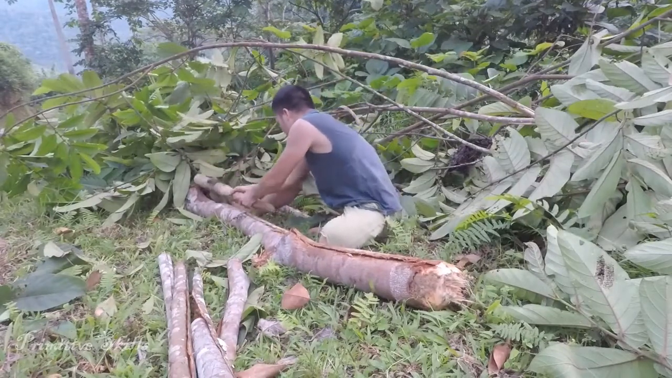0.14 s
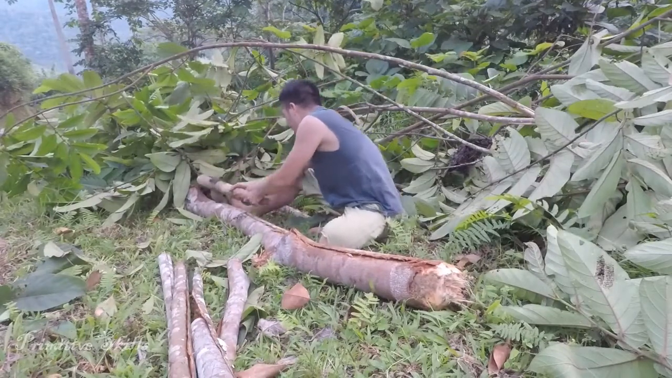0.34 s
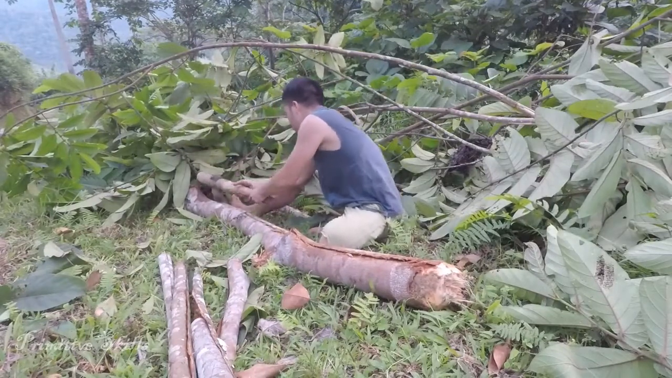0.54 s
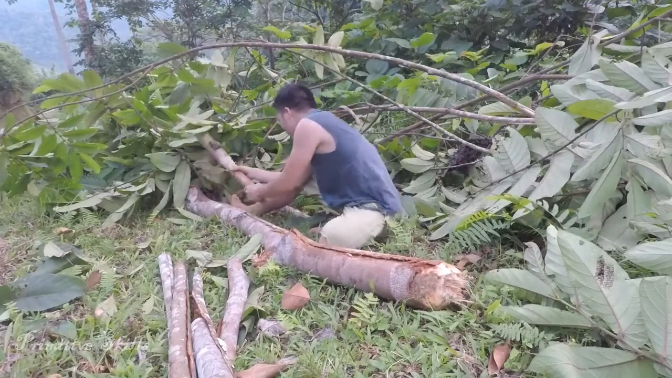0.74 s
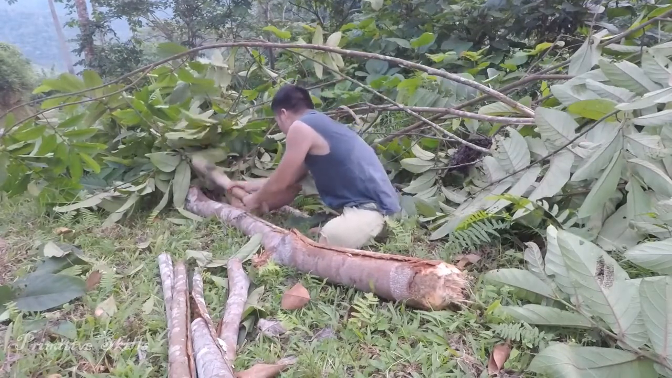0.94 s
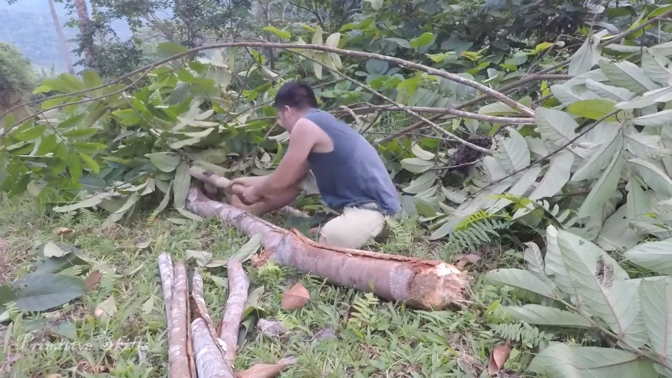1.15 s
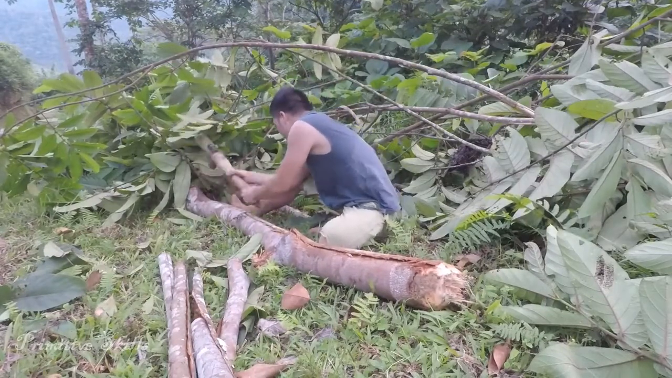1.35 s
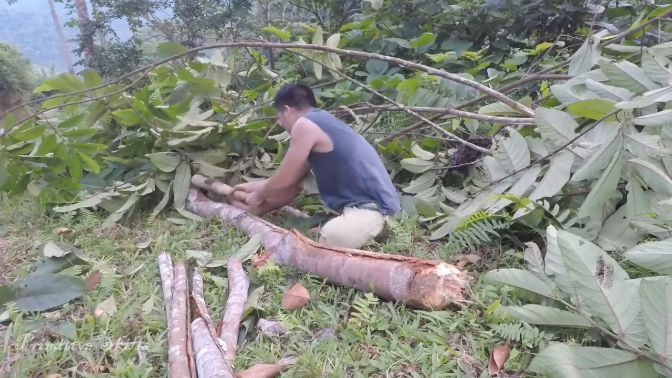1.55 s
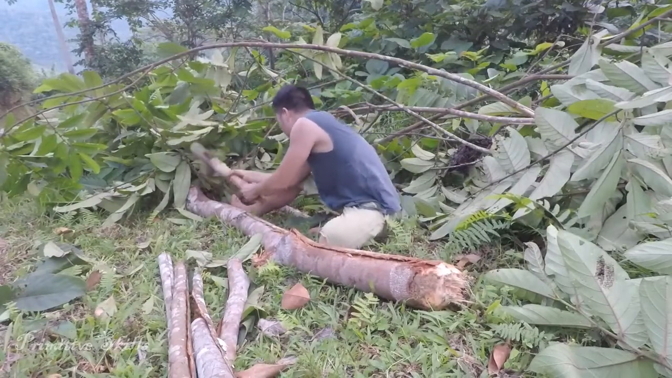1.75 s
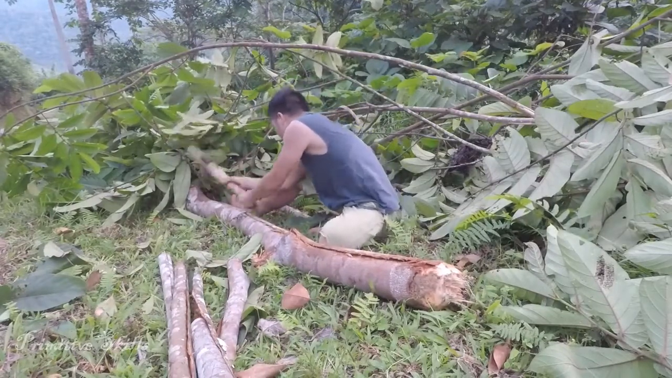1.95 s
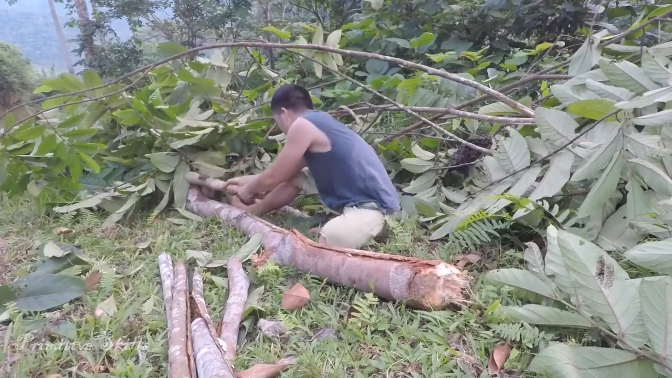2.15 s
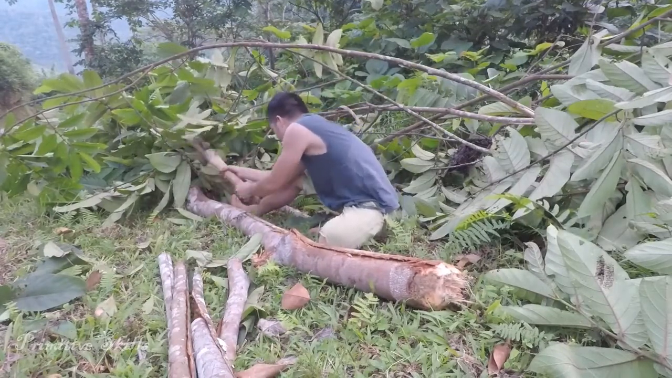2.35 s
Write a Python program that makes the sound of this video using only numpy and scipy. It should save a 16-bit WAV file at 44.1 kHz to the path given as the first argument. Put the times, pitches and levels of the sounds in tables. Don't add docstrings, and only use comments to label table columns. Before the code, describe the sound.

A wooden club strikes a felled log four times, knocking and thudding, while forest insects trill

```python
import sys
import numpy as np
from scipy import signal
from scipy.fft import rfft, irfft
from scipy.io import wavfile

SR = 44100
rng = np.random.default_rng(int(sys.argv[2]) if len(sys.argv) > 2 else 0)


def master_out(mix):
    frames = np.transpose(np.atleast_2d(mix))
    ceiling = np.clip(frames, -1, 1)
    pcm = np.round(ceiling * 32767).astype(np.int16)
    wavfile.write(sys.argv[1], SR, pcm)


def ratio_of_db(decibels):
    return 10 ** (np.asarray(decibels, float) / 20)


N = 105840

# t/s, log ring level/dB, brightness/dB per octave, partner modes level/dB, thud level/dB
BLOWS = [
    (0.2193, -12, 3, 0, -8.5),
    (1.079, -16, 3.5, 0, -2),
    (1.579, -15, 2.5, 1.5, -9),
    (2.1003, -17.5, 3.5, 2, -1.5),
]
# knock f/Hz, knock level/dB, snap f/Hz, snap level/dB, bark crush level/dB
CONTACTS = [(1466, -9, 2570, -17, -62), (1754, -14, 5340, -20.5, -23), (1636, -13.5, 4000, -11.5, -34),
            (1828, -13, 3960, -18.5, -23.5)]


def rms_one(x):
    return x / np.sqrt(np.mean(x ** 2) + 1e-20)


def drift(rate):
    step = 40
    r = np.exp(-2 * step * np.pi * rate / SR)
    noise = rng.standard_normal(N // step + 2002)
    slow = signal.lfilter([1], [1, -2 * r, r * r], noise)[2000:]
    return np.interp(np.arange(N) / step, np.arange(len(slow)), rms_one(slow))


def ring(x, hz, t60):
    r, w = ratio_of_db(-60 / (t60 * SR)), 2 * np.pi * hz / SR
    return signal.lfilter([0, np.sin(w)], [1, -2 * r * np.cos(w), r * r], x + 1e-18)


def resonate(x, hz, width_hz):
    r = np.exp(-np.pi * width_hz / SR)
    poles = [1, -2 * r * np.cos(2 * np.pi * hz / SR), r * r]
    return signal.lfilter([(1 - r * r) / 2, 0, (r * r - 1) / 2], poles, x)


def cut(x, hz, kind, order=2):
    return signal.sosfilt(signal.butter(order, hz, kind, fs=SR, output="sos"), x)


def colour(x, spectrum):
    hz, db = np.transpose(spectrum)
    f = np.arange(N // 2 + 1) * SR / N + 1
    return rms_one(irfft(rfft(x) * ratio_of_db(np.interp(np.log(f), np.log(hz), db)), N))


def clicks(s, gains):
    out = np.zeros(N)
    np.add.at(out, np.clip(np.asarray(s) * SR, 0, N - 1).astype(int), gains)
    return out


def grains(per_s, spread_db):
    sizes = ratio_of_db(spread_db * np.minimum(rng.exponential(1, (2, N)), 5))
    sizes = sizes * rng.choice([-1, 1], (2, N))
    return sizes * (rng.random((2, N)) < per_s / SR)


def later(x, s):
    return np.interp(np.arange(N) - s * SR, np.arange(N), x)


def pan(x, db):
    return x * ratio_of_db(np.array([[db / 2], [-db / 2]]))


def spread(pair, alike):
    alike = np.clip(alike, 0, 1)
    mid = np.sqrt(1 + alike) * pair[0]
    side = np.sqrt(1 - alike) * pair[1] * np.array([[1], [-1]])
    return (mid + side) / np.sqrt(2)


def air():
    # f/Hz, level/dB per Hz
    air_spectrum = [(60, -28), (150, 3.5), (400, -6.5), (1200, -16), (3000, -10), (8200, -17.5),
                    (8800, -28.5)]
    low = colour(spread(rng.standard_normal((2, N)), 0.067), air_spectrum)
    hiss = rms_one(cut(rng.standard_normal((2, N)), [10500, 14000], "band"))
    return low * ratio_of_db(-48 + 1.0 * drift(1.33)) + hiss * ratio_of_db(-74 + 0.8 * drift(3.9))


def through_shell(x):
    return cut(x, 8340, "low", order=10)


def cicada_chorus():
    # f/Hz, width/Hz, level/dB
    shells = [(4762, 428, -0.5), (5057, 190, -0.5), (5420, 355, 0), (5740, 2050, -13.5), (7646, 684, -5.5)]
    swarm = spread(grains(5400, 1.52), 0.69)
    chorus = 0
    for k, (hz, width_hz, db) in enumerate(shells):
        voice = resonate(resonate(swarm, hz, 2 * width_hz), hz, width_hz)
        chorus = chorus + ratio_of_db(db + 1.17 * drift(10.3)) * (-1) ** k * voice
    return through_shell(pan(ratio_of_db(-40) * rms_one(chorus), 1))


def near_buzz():
    # f/Hz, width/Hz, level/dB
    buzz_shell = [(7330, 600, 12), (7130, 130, -0.5)]
    start_s, period_s, pulse_s = 0.0165, 0.01998, 0.00267
    s = (start_s + period_s * np.arange(121)[:, None] + pulse_s * np.arange(5)).ravel()
    gains = ratio_of_db(rng.normal(0, 3.2, len(s))) * (s < N / SR)
    pulses = clicks(s + rng.normal(0, 0.00015, len(s)), gains)
    buzz = 0
    for hz, width_hz, db in buzz_shell:
        buzz = buzz + ratio_of_db(db) * resonate(resonate(pulses, hz, 2 * width_hz), hz, width_hz)
    pair = np.array([buzz, later(buzz, 0.00006)])
    return through_shell(pan(ratio_of_db(-47.5) * rms_one(pair), 11))


def far_crickets():
    # f/Hz, width/Hz, level/dB, throb/dB
    bands = [(3870, 50, -69, 1.5), (2550, 60, -68, 1.5)]
    out = 0
    for hz, width_hz, db, throb_db in bands:
        song = resonate(resonate(rng.standard_normal(N), hz, width_hz), hz, width_hz)
        out = out + ratio_of_db(db + throb_db * drift(8.3)) * rms_one(song)
    return out


def near_cricket():
    # t/s, length/s, level/dB
    phrases = [(0, 0.047, -53.5), (0.13, .07, -54.5), (.27, 0.053, -55), (0.348, 0.062, -56.5),
               (0.492, 0.2, -56), (0.87, 0.28, -58), (1.193, 0.18, -60), (1.426, 0.12, -58),
               (1.7, 0.12, -60.5), (1.85, 0.33, -59), (2.203, 0.24, -57)]
    t, shape = np.arange(N) / SR, 0
    for s, length, db in phrases:
        end = s + length
        shape = shape + ratio_of_db(db) * np.interp(t, [s - 0.01, s + 0.008, end - 0.015, end + 0.0065], [0, 1, 1, 0])
    hz = 3552 + 8.84 * drift(16.3)
    tone = np.sqrt(2) * np.sin(2 * np.pi * np.cumsum(hz) / SR)
    return shape * ratio_of_db(2.0 * drift(16)) * tone


def leaves():
    # t/s, length/s, level/dB
    rustles = [
        (0.021, 0.054, -55),
        (0.692, 0.082, -49.5),
        (0.797, 0.084, -49),
        (0.96, 0.026, -50),
        (1.326, 0.07, -52),
        (1.404, 0.038, -57),
        (1.834, 0.087, -49.5),
        (2.178, 0.014, -43),
        (2.257, 0.09, -42),
    ]
    # f/Hz, level/dB per Hz
    leaf_spectrum = [(600, -25), (1200, -6.5), (2000, -1.5), (4200, 1), (8000, -15), (15000, -35)]
    t, shape = np.arange(N) / SR, 0
    for s, length, db in rustles:
        corners = [s, s + 0.022, s + 0.5 * length, s + 1.65 * length]
        shape = shape + ratio_of_db(db) * np.interp(t, corners, [0.035, 1, 0.89, 0.017])
    return shape * colour(spread(grains(9000, 2.5), 0.65), leaf_spectrum)


def bark_and_splinters():
    splinter_levels = [-23, -22.5, -20.5, -27.5]
    crush_s, hold_s, splinter_t60_s, scatter_t60_s = 0.018, 0.0037, 0.043, 0.67
    t, out = np.arange(N) / SR, 0
    noise = spread(rng.standard_normal((2, N)), 0.28)
    crush = cut(cut(noise, 230, "high"), 2320, "low", order=1)
    splinter = cut(cut(noise, 1000, "high"), 5560, "low")
    scatter = cut(cut(noise, 280, "high"), 1670, "low")
    for (s, *_), (_, knock_db, _, _, crush_db), splinter_db in zip(BLOWS, CONTACTS, splinter_levels):
        after, on = np.maximum(t - s, 0), t >= s
        splinter_fall_db = 60 * np.maximum(after - hold_s, 0) / splinter_t60_s
        out = out + ratio_of_db(crush_db) * np.clip(1 + (t - s) / crush_s, 0, 1) * ~on * crush
        out = out + on * ratio_of_db(splinter_db - splinter_fall_db) * splinter
        out = out + on * ratio_of_db(knock_db - 22.5 - 60 * after / scatter_t60_s) * scatter
    return out


def club_knock():
    # ratio to knock f, level/dB
    club_modes = [(.7, -8.5), (.85, -4.5), (1.0, 0), (1.3, -5.5)]
    rebound_s, rebound_db = 0.005, -11
    out = 0
    for (s, *_), (knock_hz, knock_db, *_) in zip(BLOWS, CONTACTS):
        hit = clicks([s - 0.0003, s + rebound_s], ratio_of_db(np.array([knock_db, knock_db + rebound_db])))
        knock = 0
        for k, (ratio, db) in enumerate(club_modes):
            knock = knock + ratio_of_db(db) * (-1) ** k * ring(hit, knock_hz * ratio, 0.027)
        out = out + pan(np.array([knock, later(knock, 0.00014)]), -4)
    return out


def fibre_snap():
    snap_delays = [0.00155, 0.00153, 0.00042, 0.00301]
    out = 0
    for (s, *_), (_, _, snap_hz, snap_db, _), delay_s in zip(BLOWS, CONTACTS, snap_delays):
        for ratio, gain in ((1, 1), (0.743, -0.7)):
            out = out + ring(clicks([s + delay_s], gain * ratio_of_db(snap_db)), snap_hz * ratio, 0.0077)
    return out


def log_thud():
    s, *_, thud_db = np.transpose(BLOWS)
    thud = ring(clicks(s + 0.0032, ratio_of_db(thud_db)), 519, 0.0089)
    return pan(cut(thud, 196, "high"), 4)


def log_ring():
    # level/dB, t60/s, sign and size of push; then their f/Hz
    main_modes = [(-21.5, 0.5, 1), (-3, .19, 1), (-1, 0.15, 0.61), (-3.5, 0.14, -0.78), (-15, 0.026, -2.04),
                  (-15, 0.077, 0.92)]
    main_pitches = [165, 334, 495, 641, 850, 1005]
    # level/dB, t60/s, sign and size of push; then their f/Hz
    partner_modes = [(-23, 0.54, -1.2), (-3.5, 0.16, -0.76), (-10, 0.15, 0.85), (-4, .14, -0.79),
                     (-37, 0.16, -0.2)]
    partner_pitches = [146, 301, 373, 458, 695]
    upper_levels = [-8, 2, -0.5, 4.5]
    s, ring_db, tilt_db, partner_db, _ = np.transpose(BLOWS)
    out = 0
    families = ((main_pitches, main_modes, 0), (partner_pitches, partner_modes, partner_db))
    for pitches, modes, extra_db in families:
        for hz, (level_db, t60, sign) in zip(pitches, modes):
            push_db = ring_db + extra_db + level_db + tilt_db * np.log2(hz / 334)
            push_db = push_db + np.array(upper_levels) * (hz > 600)
            out = out + ring(clicks(s + 0.0041, -sign * ratio_of_db(push_db)), hz, t60)
    out = cut(out, 602, "low")
    return pan(np.array([later(out, 0.000324), out]), 7.5)


def scene():
    insects = cicada_chorus() + near_buzz() + far_crickets() + near_cricket()
    blows = bark_and_splinters() + club_knock() + fibre_snap() + log_thud() + log_ring()
    return air() + insects + leaves() + blows


def roll_off(x):
    return signal.sosfilt(signal.butter(12, 15780, fs=SR, output="sos"), x)


def record(dry):
    hum = ratio_of_db(-77) * rms_one(cut(rng.standard_normal((2, N)), 100, "low"))
    x = cut(dry, 144, "high", order=5) + hum
    x = signal.sosfilt(signal.cheby2(12, 70, 15700, fs=SR, output="sos"), x)
    return roll_off(x)


dry = scene()
out = record(dry)
master_out(out)
```